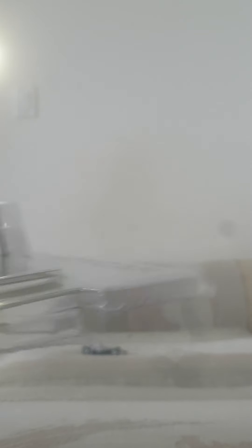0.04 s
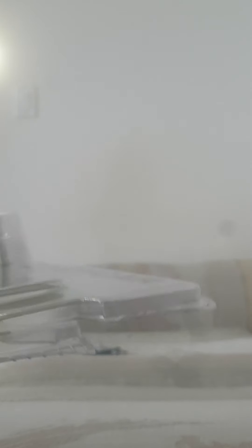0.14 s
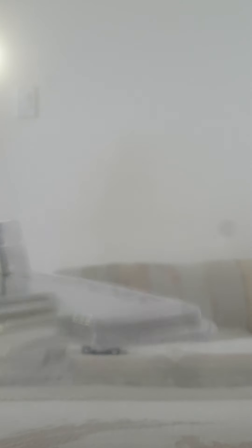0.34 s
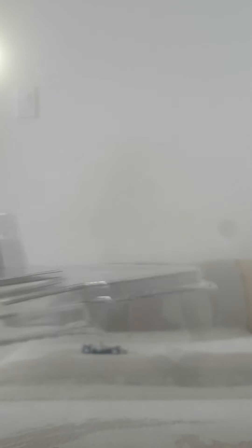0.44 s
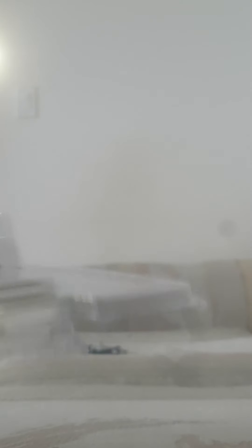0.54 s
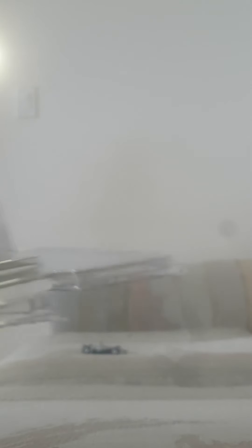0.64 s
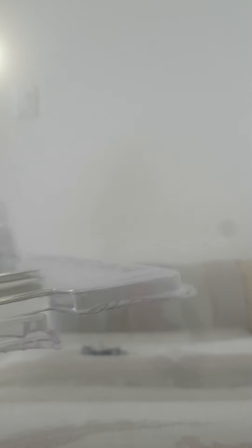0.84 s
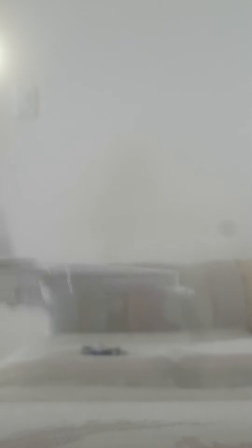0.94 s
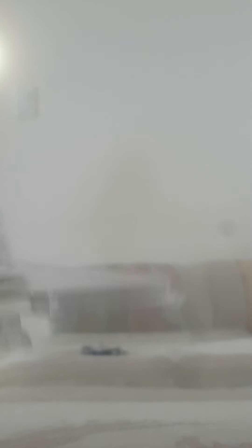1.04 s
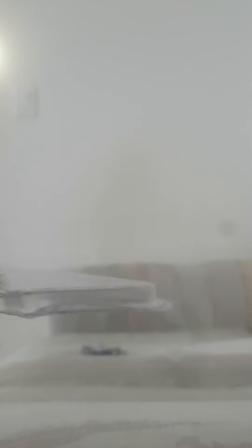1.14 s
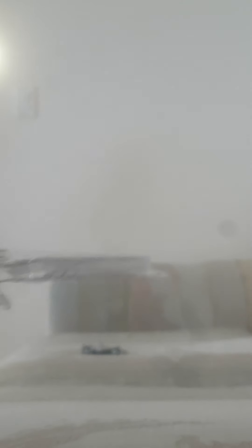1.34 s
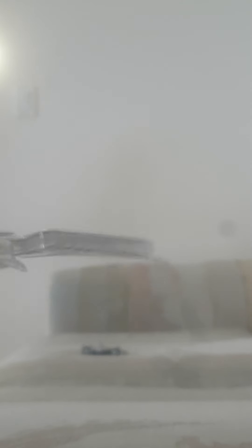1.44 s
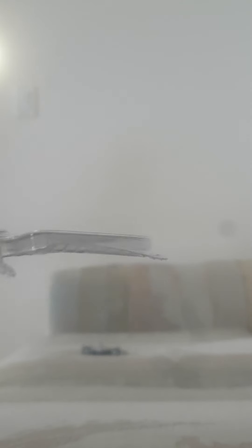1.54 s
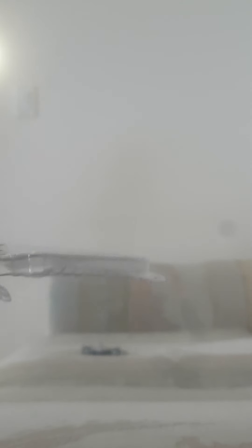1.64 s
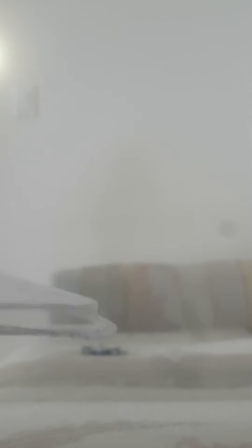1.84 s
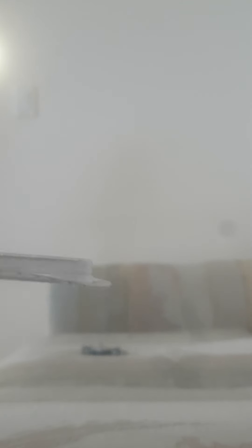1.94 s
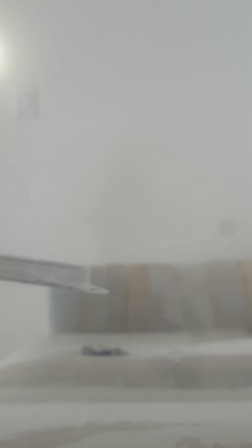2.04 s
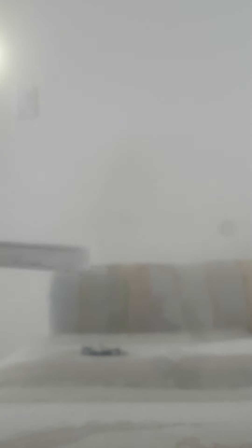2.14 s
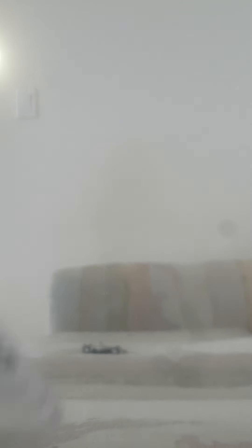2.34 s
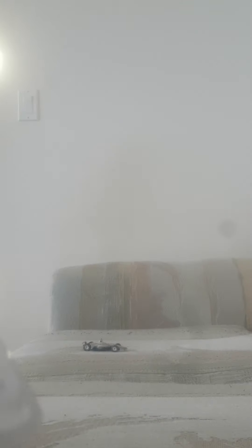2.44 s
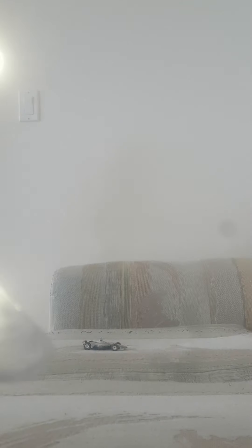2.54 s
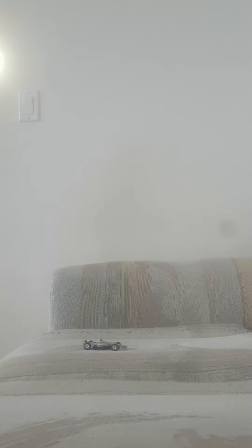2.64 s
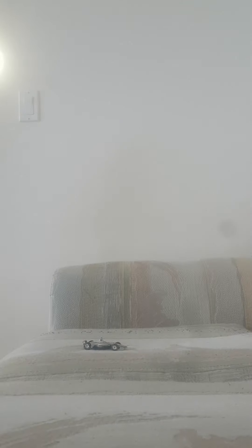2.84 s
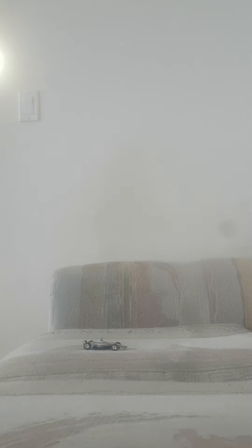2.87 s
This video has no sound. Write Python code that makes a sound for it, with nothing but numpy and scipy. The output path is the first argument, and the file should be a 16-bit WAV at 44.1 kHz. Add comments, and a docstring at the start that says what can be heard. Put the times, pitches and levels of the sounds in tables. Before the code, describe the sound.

Stiff thin plastic packaging crackles, pops and snaps in irregular bursts, close and left of a stereo pair in a quiet small room.

```python
"""Stiff clear plastic packaging snaps as hands bend and pull it apart, close to the left of a stereo recorder.
Each snap is a buckling instability: a jolt excites a damped panel and a spray of tiny slips makes the treble.
Stick-slip friction, as random grains through resonances, makes the rubbing; fainter random ticks fill the gaps.
A small room answers with wall echoes and a short tail over quiet rumble and hiss.
Two hard snaps also puff air at the near microphone."""
import sys
import numpy as np
from scipy import signal
from scipy.fft import rfft, irfft
from scipy.io import wavfile
from scipy.ndimage import uniform_filter1d, map_coordinates

SR = 44100
rng = np.random.default_rng(int(sys.argv[2]) if len(sys.argv) > 2 else 0)


def to_wav(sig):
    """Store sig (one row per channel, or 1-D mono) as 16-bit WAV at the path in sys.argv[1].

    Samples outside -1..1 are clipped; the rate is SR.
    """
    pcm = np.clip(np.atleast_2d(sig), -1, 1) * 32767
    pcm = np.round(pcm).astype(np.int16)
    wavfile.write(sys.argv[1], SR, pcm.T)  # frames by channels


N = 264159  # length [samples]
HZ = np.fft.rfftfreq(2048, 1 / SR)  # frequency grid of the filters [Hz]


def amp(db):
    """Decibel law: a level becomes an amplitude ratio."""
    return 10 ** (np.asarray(db) / 20)


def evened(x):
    """Root-mean-square normalisation: the mean power becomes one."""
    return x / np.sqrt(np.mean(x ** 2) + 1e-20)


def unit(x):
    """Energy normalisation: the sum of squares becomes one."""
    return x / np.linalg.norm(x)


def read(points, hz):
    """Logarithmic pitch scale: a curve is interpolated between its points along log frequency."""
    f, value = np.transpose(points)
    return np.interp(np.log(hz + 1), np.log(f + 1), value)


def causal(db):
    """Minimum phase: the Hilbert transform of log gain gives the response of least delay."""
    log_gain = np.log(amp(np.maximum(db, -100)))
    circle = np.concatenate([log_gain, log_gain[-2:0:-1]])
    return np.fft.ifft(np.exp(np.conj(signal.hilbert(circle)))).real


def spray(chance, fade):
    """Spectral whitening: a burst of slips under the envelope fade, with no band left out."""
    for _ in range(3):
        spectrum = rfft(chance * fade)
        flat = irfft(spectrum / (abs(spectrum) + 1e-12), len(fade))
        chance = flat / (fade + .05)
    return unit(chance * fade)


# Resonances of the plastic shell: (frequency [Hz], width [Hz], height [dB])
SHELL_MODES = [(124.1, 13, 6.5), (381.7, 22, 5), (603, 310, 5), (1052, 400, 5), (1990, 940, 5),
               (3880, 650, 3), (9050, 3100, 3), (13400, 8400, 4)]


def shell_db():
    """Modal resonance: the shell's modes stand as bumps on a flat response."""
    return sum(db / (1 + (2 * (HZ - hz) / width) ** 2) for hz, width, db in SHELL_MODES)


# Restless fingers on the plastic: (time [s], body level [dB], fizz level [dB])
RUBBING = [(0.0, -66.5, -71.5), (0.83, -72, -76.5), (1.07, -59, -71), (1.27, -68.5, -72.5),
           (3.85, -66.5, -74.5), (4.1, -52, -75), (4.42, -62.5, -65), (4.85, -48.5, -57.5),
           (5.37, -57, -72), (5.99, -83.5, -90.5)]
# Single strokes: (start [s], end [s], body level [dB], fizz level [dB])
STROKES = [(0.401, 0.466, -59.5, -64), (0.514, 0.595, -64.5, -50.5), (1.175, 1.257, -43, -42.5),
           (1.827, 1.935, -48.5, -46.5), (2.059, 2.168, -59, -57.5), (2.528, 2.603, -55, -58.5),
           (2.693, 2.773, -36, -41), (2.831, 2.912, -60, -62.5), (2.88, 2.96, -38.5, -60),
           (4.247, 4.317, -48.5, -44), (4.385, 4.457, -42.5, -55), (5.024, 5.033, -52, -43),
           (5.137, 5.256, -63, -62.5), (5.247, 5.283, -58, -52.5), (5.442, 5.469, -51.5, -69)]
# Spectrum of the rubbing body: (frequency [Hz], gain [dB])
BODY_COLOUR = [(40, -33.5), (110, -5.5), (300, 1), (800, -3), (2300, -7), (3500, -22.5), (8000, -33.5)]


def rub():
    """Stick-slip friction: dense uneven slips ring the shell below and give dry fizz above."""
    s, body_db, fizz_db = np.transpose(RUBBING)
    t = np.arange(N) / SR
    body_gain = amp(np.interp(t, s, body_db))
    fizz_gain = amp(np.interp(t, s, fizz_db))
    for start, end, low_db, high_db in STROKES:
        progress = np.clip((t - start) / (end - start), 0, 1)
        stroke = np.sin(np.pi * progress ** 0.8) ** 1.56
        body_gain = body_gain + amp(low_db) * stroke
        fizz_gain = fizz_gain + amp(high_db) * stroke
    sizes = amp(4.14 * np.minimum(rng.exponential(1, N), 5))
    signs = rng.choice([-1., 1.], N)
    happens = rng.random(N) < 5000 / SR  # on average 5000 slips per second
    grains = evened(sizes * signs * happens) + 0.5 * rng.standard_normal(N)
    body_filter = causal(read(BODY_COLOUR, HZ) + shell_db())[:1200]
    fizz_colour = [(1200, -38.0), (3500, 7.0), (8000, -3.0), (15500, -3.5), (16200, -23)]
    fizz_filter = causal(read(fizz_colour, HZ) + shell_db())[:1200]
    body = signal.oaconvolve(grains, body_filter)[:N]
    fizz = signal.oaconvolve(grains, fizz_filter)[:N]
    # the grip catches and slackens
    smooth = uniform_filter1d(rng.standard_normal(N), 500)
    lumps = evened(uniform_filter1d(smooth, 500))
    return amp(3.0 * lumps) * body_gain * evened(body) + fizz_gain * evened(fizz)


# Relative spectrum of the room noise: (frequency [Hz], density [dB per Hz])
AIR_COLOUR = [(12, -13), (20, -2.5), (79, -13), (124, -20), (195, -11.5), (237, -19), (1210, -32),
              (2510, -29), (3330, -38), (5830, -37.5), (6910, -40.5), (15200, -49.5), (16500, -59.5)]
# Likeness of the noise on the two sides: (frequency [Hz], correlation [0 to 1])
AIR_LIKENESS = [(60, 0.3), (200, 0.32), (800, 0.78), (4000, 0.39)]
AIR_DB = -67  # mean level of both sides, before the left-right balance [dB]


def air():
    """Partially coherent noise: the quiet room's low rumble and hiss, alike on both sides by band."""
    frames, hz = N // 256 + 5, np.fft.rfftfreq(1024, 1 / SR)
    a, b, c, d = rng.standard_normal((frames, 513, 4)).T
    same = np.clip(read(AIR_LIKENESS, hz), -1, 1)[:, None]
    left = a + 1j * b
    right = same * left + np.sqrt(1 - same ** 2) * (c + 1j * d)
    spectra = np.array([left, right]) * amp(read(AIR_COLOUR, hz))[:, None]
    noise = signal.istft(spectra, nperseg=1024, noverlap=768)[1][:, :N]
    return amp(AIR_DB) * evened(noise)


# Decay of the tail: (frequency [Hz], time to fall 60 dB [s])
DECAY = [(100, 0.37), (400, 0.17), (1000, 0.2), (3000, 0.26), (8000, 0.24), (16000, 0.2)]
# Strength of the tail: (frequency [Hz], gain [dB])
TAIL_COLOUR = [(50, -6), (130, 4.5), (250, -17.5), (380, 6), (600, -5), (1500, -3.5), (5000, -5),
               (16000, -1.5)]
# Early echoes before colouring: (delay [ms], left level [dB], right level [dB])
ECHOES = [(2.114, -4, 3.5), (10.22, -11.5, -4.5), (11.724, -11.5, -11), (13.346, -14, -19),
          (14.43, -14, -17.5), (19.76, -16, -13), (35.5, -23, -30.5)]
# Spectrum of the early echoes: (frequency [Hz], gain [dB])
ECHO_COLOUR = [(100, -19), (500, -8.5), (2000, -5.5), (8000, -6)]


def room(x):
    """Reverberation: rough wall echoes, and sparse taps of random sign whose bands decay exponentially."""
    taps = np.zeros((2, SR // 2))
    grid = np.arange(100, SR // 2 - 20, 20)
    at = grid + rng.integers(0, 20, (2, (SR // 2 - 101) // 20))
    np.put_along_axis(taps, at, rng.choice([-1., 1.], at.shape), 1)
    taps /= np.linalg.norm(taps[0, :SR // 20])
    # only near things answer before the walls
    taps *= np.interp(np.arange(SR // 2) / SR, [.009, .011, .025], [.3, .6, .95])
    hz, t, spectra = signal.stft(taps, SR, nperseg=256)
    tail_db = -60 * t / read(DECAY, hz)[:, None] + read(TAIL_COLOUR, hz)[:, None]
    response = signal.istft(spectra * amp(tail_db), SR, nperseg=256)[1]
    echoes = np.zeros((2, 2048))
    for ms, left_db, right_db in ECHOES:
        at = round(ms * SR / 1000)
        smear = [spray(c, np.hanning(32)) for c in rng.standard_normal((2, 32))]
        echoes[:, at:at + 32] += amp([[left_db], [right_db]]) * smear
    echo_filter = causal(read(ECHO_COLOUR, HZ))[None]
    response[:, :2048] += signal.fftconvolve(echoes, echo_filter, axes=1)[:, :2048]
    return signal.oaconvolve(x, response, axes=1)[:, :N]


def snap(hz, thump_db, panel_db, crack_db, sizzle_db, pan_db, slip_ms, chance):
    """Buckling instability: one jolt rings the panel that buckled; a dying spray of slips makes the treble."""
    t = np.arange(len(chance)) / SR
    thump_colour = [(15, -25.5), (60, 1), (150, 11), (400, -7.0), (2000, -76.5)]
    thump = unit(causal(read(thump_colour, HZ) + shell_db()))

    slope_db = read([(100, -36.5), (300, 0), (2500, -1), (4500, -15.5), (16000, -36.5)], HZ)
    # each bend leaves the lesser modes elsewhere
    slope_db += 3.25 * np.interp(HZ, np.geomspace(200, 5000, 30), chance[-30:])
    width = 38.0 + hz ** 2 / 8100.0  # small panels are damped harder [Hz]
    ring_db = 7.4 / (1 + ((HZ - hz) / width) ** 2)
    # a large panel radiates little above its own pitch, and a small one little below it
    ring_db -= 3.87 * np.log2(1 + (HZ / (1.35 * hz)) ** 2) / 2
    ring_db -= 1.3 * np.log2(1 + (0.51 * hz / (HZ + 1)) ** 2) / 2
    panel = unit(causal(slope_db + ring_db + shell_db()))

    fade = np.exp(-1000 * t / np.clip(slip_ms, .1, 8)) * np.minimum(t / .0003, 1)
    slips = spray(chance, fade)
    # each crease has its own bands
    uneven_db = 3.17 * np.interp(HZ, np.geomspace(1500, 16000, 24), chance[-60:-36])
    crack_colour = [(1500, -14.5), (2800, 11), (6000, 12.5), (9000, -14.0)]
    sizzle_colour = [(4500, -27.5), (7500, 3.0), (16000, 3.5)]
    crack = unit(causal(read(crack_colour, HZ) + shell_db() + uneven_db))
    sizzle = unit(causal(read(sizzle_colour, HZ) + shell_db() + uneven_db))
    treble_filter = amp(crack_db) * crack + amp(sizzle_db) * sizzle
    treble = signal.fftconvolve(slips, treble_filter)[:len(panel)]

    # a flexing sheet may push one microphone and pull the other
    sides = np.array([[1], [np.sign(chance[0] + .4)]])
    return amp(thump_db) * sides * thump + amp([[0], [-pan_db]]) * (amp(panel_db) * panel + treble)


# Creases that let go, levels as they leave the plastic: (time [s], panel pitch [Hz], thump energy [dB],
# panel energy [dB], treble before its crack-sizzle tilt [dB], left over right in panel and treble [dB])
SNAPS = [(0.0335, 396, -25, -27.5, -34.5, -1.5), (0.082, 480.0, -17, -28.0, -38, 4),
         (0.102, 945, -15.5, 1, 0.6, 5.5), (0.1419, 765, -32.0, -9.5, -13.5, 5),
         (0.149, 2150, -25, -16.5, -29, 0.5), (0.3363, 705, -27, -9, -32, 1.5),
         (0.4046, 1940, -36, -38, -46, 1), (0.4207, 462, -27.5, -22.5, -29.5, 3),
         (0.6653, 362, -19.5, -15.5, -17, 3), (0.6995, 706, -36, -23, -48.0, 5),
         (0.8356, 2140, -29, -4.5, -19, 21), (0.8439, 2140, -20, -8.5, -17, -4.5),
         (0.864, 2230.0, -25, 4.5, -5.5, 5.5), (0.8867, 2310.0, -27, 0.5, -7, 2.5),
         (0.8914, 2050.0, -37, -2, -5, 7.5), (0.979, 2320, -35, -9, -19.0, 4.5),
         (0.996, 248, -18, -13, -24, 3), (1.0172, 353, -7, 2.5, -8.5, 2.5),
         (1.1703, 950.0, -26, -17.0, -20.5, 3), (1.2164, 1270.0, -17, -20, -11, 23),
         (1.316, 814, -42, -26.5, -32, 4.0), (1.5116, 530, -39, -19.5, -30, -3.0),
         (1.5273, 734, -4.5, -10.5, -16.5, -1.5), (1.56, 553.0, -26, -5.0, -17.5, -1),
         (1.5943, 617, -9.5, -6, -15.5, -1.5), (1.6357, 610.0, -17.5, -15.5, -20.5, 0),
         (1.8002, 1120, -35, -33.5, -33.5, -10.5), (1.8319, 616.0, -39, -21, -9.5, -2),
         (1.8451, 417.0, -35, -24.0, -13, 13.0), (1.8681, 424, -30.5, -30, -42, -11),
         (1.876, 613, -15, -24, -26, -8), (2.0973, 715, -55, -30, -36, -4),
         (2.1538, 620.0, -17.5, -8, -12.25, -4.5), (2.178, 600, -10.5, -4.5, -14.5, 4.5),
         (2.2194, 670, -15, -11.5, -19.5, -4.5), (2.2693, 550, -11.0, 0.5, -12.0, 4.5),
         (2.3354, 1000, -19, -7.5, -20.75, 0), (2.3777, 730, -40.0, -30, -18.25, 10),
         (2.5486, 445, -27.5, -33.5, -35, -14), (2.722, 324, -17, -1.5, -10, 14),
         (2.9163, 596, -30, -12, -42, -5.5), (2.9221, 460, -18.5, -9.5, -18, -1),
         (2.9278, 1900, -25.5, -5.5, -13, 8), (2.9814, 634, -35, -19.5, -33, 4),
         (3.0366, 1130, -51, -18.5, -33.5, 3), (3.1261, 840, -44, -24, -32.5, 11),
         (3.2388, 1300, -35, -3.5, -25.5, 6.5), (3.2545, 410.0, -39.0, -30, -26, 15.0),
         (3.2892, 480, -28.5, -10.5, -15.5, -5.5), (3.3192, 1430, -31, 1.5, -13, 8.5),
         (3.3778, 1200, -32, -12.5, -12.5, 1.5), (3.437, 840, -37, -20.5, -40, -0.5),
         (3.6212, 660.0, -44.0, -16.5, -54, 0.5), (3.643, 510.0, -30, -33, -24, -7),
         (3.7602, 1000.0, -28.5, -17.5, -27, -6), (3.8128, 790.0, -39.0, -27.0, -28.0, 3.0),
         (3.8448, 600.0, -57, -25.5, -34.5, 0.5), (3.91, 517, -25.5, 3, -11.5, 3.5),
         (3.9479, 1750, -25, -1.5, -7.5, 6), (3.9788, 620, -39.0, -17.5, -31, -3),
         (4.011, 2030.0, -7.0, 10, -0.25, 10), (4.0157, 990.0, -11.5, 4, -7.5, 10),
         (4.0336, 675, -23.5, 3.5, 0.5, 2.5), (4.1227, 1940, -20.0, 12.5, 5.5, 4.5),
         (4.1536, 1100.0, -36.5, -16.5, -17.5, -2), (4.189, 808, -45.0, -5.0, -15.5, 5),
         (4.22, 2040, -23, -10, -15.5, -7.5), (4.2404, 1670.0, -28, -8.5, -3.0, -6),
         (4.2871, 2100, -21, -6, -11.25, 6), (4.411, 960.0, -42, -15, -33, 31),
         (4.4186, 900.0, -22, -33, -30.5, -7), (4.4367, 369, -19.0, 7, 2, 12),
         (4.507, 320, -21.5, -12.5, -27, 1.0), (4.571, 520, -37, -19.5, -30, -9),
         (4.601, 674, -42, -11, -14, 0.5), (4.6243, 1200.0, -32, -13, -13.25, 5.5),
         (4.6491, 418, -9.5, 10.5, -5, 2.5), (4.6861, 540, -33, -11.0, -19.5, 2.0),
         (4.7613, 1140, -22, 8, -0.5, 4.5), (4.8352, 1460.0, -25, -18, -24, 6),
         (4.8498, 2200.0, -22, -6, -6.25, 13), (4.864, 583, -12.5, 3, 7.5, 7),
         (4.9505, 650, -21, -5, -3.5, 3.5), (5.0229, 900, -45, -15.0, -20.5, 20),
         (5.038, 1400, -28.0, -1, -18, 14), (5.0663, 1010, -34, -24, -17, -10),
         (5.0698, 1170, -27, -24, -19.5, -10), (5.1025, 1030, -47.0, -15.5, -55.0, -1.0),
         (5.2493, 1110, -33, -25, -29, -9.5), (5.2578, 1030, -18, -14.5, -31, 23),
         (5.2975, 380.0, -25.5, -21, -36.5, 0.5), (5.3714, 550, -30.5, -36, -45, -5),
         (5.4179, 1080, -35, -31, -42, -5), (5.4316, 1120, -40, -20.5, -46.5, -1.0),
         (5.4835, 1030, -40.5, -32.5, -44, -3), (5.6357, 2220.0, -5, 3.5, 11, 5.5),
         (5.7426, 1550.0, -45, -21, -27, -2.5), (5.8526, 2450.0, -47.5, -24, -28, 5.0),
         (5.9458, 713.0, -57, -31.5, -48.5, 0)]
SLIP_MS, SLIP_SPREAD = .8, .3  # median decay of a crease's slips [ms], and its deviation [log]
# sizzle over crack [dB]; it grows with the extra path, as the hands move towards the near microphone [dB per ms]
SIZZLE_DB, SIZZLE_DB_PER_MS = 0.5, 29.5
SIZZLE_SPREAD_DB = 3  # no two creases are equally bright [dB]


def snaps():
    """Superposition: every snap and tick adds up, as it leaves towards the left and right microphone."""
    out = np.zeros((2, N + 4000))
    chance = rng.standard_normal((len(SNAPS) + 60, 512))
    for (s, hz, thump_db, panel_db, treble_db, pan_db), c in zip(list(SNAPS) + ticks(), chance):
        path_ms = np.interp(s, *np.transpose(EXTRA_PATH))
        tilt_db = SIZZLE_DB + SIZZLE_DB_PER_MS * path_ms + SIZZLE_SPREAD_DB * c[2]
        crack_db, sizzle_db = treble_db - tilt_db / 2, treble_db + tilt_db / 2
        slip_ms = SLIP_MS * np.exp(SLIP_SPREAD * c[1])
        sound = snap(hz, thump_db, panel_db, crack_db, sizzle_db, pan_db, slip_ms, c)
        at = max(round(s * SR), 0)
        out[:, at:at + sound.shape[1]] += sound
    return out[:, :N]


TICKS_PER_S, TICK_LOW_HZ, TICK_HIGH_HZ = 5.2, 400, 1296  # mean rate and range of panel pitch
TICK_DB, TICK_SPREAD_DB = 28, 6  # panel above the rubbing body, and the most it strays either way [dB]
TICK_THUMP_DB, TICK_TREBLE_DB = -6.5, -12  # against the panel [dB]


def ticks():
    """Poisson process: faint snaps at random gaps, as strong as the fingers are restless."""
    s, body_db, _ = np.transpose(RUBBING)
    draw = rng.random((60, 4))
    when = np.cumsum(-np.log(1 - draw[:, 0]) / TICKS_PER_S)
    db = np.interp(when, s, body_db) + TICK_DB + 2 * TICK_SPREAD_DB * (draw[:, 1] - .5)
    hz = TICK_LOW_HZ * (TICK_HIGH_HZ / TICK_LOW_HZ) ** draw[:, 2]
    pan_db = 14 * (draw[:, 3] - .5)
    rows = np.transpose([when, hz, db + TICK_THUMP_DB, db, db + TICK_TREBLE_DB, pan_db])
    return list(rows[when < N / SR])


# Air from the hardest snaps: (time [s], direction [sign], time constant [ms], approximate peak [dB])
PUFFS = [(4.865, 1, 1.5, -12), (5.6355, -1, 1.16, -9.5)]


def puffs():
    """Damped displacement: each puff pushes the near membrane one way, and it swings slowly back."""
    t, out = np.arange(N) / SR, np.zeros(N)
    for s, direction, ms, db in PUFFS:
        u = np.maximum(t - s, 0) * 1000 / ms
        out += np.sign(direction) * amp(db) * 2 * u * (2 - u) * np.exp(-u)
    return out


# Extra path to the far microphone as the hands move left: (time [s], delay [ms])
EXTRA_PATH = [(0, 0.045), (2.3, 0.036), (2.8, 0.19), (5.99, 0.19)]
# How much weaker the far microphone hears: (frequency [Hz], loss [dB])
SHADOW = [(60, -3), (400, -1.5), (2400, 3), (4400, 4.5), (6500, 2.5), (8100, 12), (11000, 15.5),
          (15000, 25.5)]


def far_microphone(right):
    """Path difference and acoustic shadow: sound arrives later, shaded by the recorder's body."""
    lag = np.interp(np.arange(N) / SR, *np.transpose(EXTRA_PATH)) * SR / 1000
    late = map_coordinates(right, [np.arange(N) - lag], order=3)
    return signal.oaconvolve(late, causal(-read(SHADOW, HZ))[:1024])[:N]


def scene():
    """Superposition: plastic, room and air reach both microphones; puffs strike only the near left one."""
    plastic = snaps() + rub()
    left, right = plastic + room(plastic) + amp([[2.], [0.]]) * air()
    return np.array([left + puffs(), far_microphone(right)])


def record(dry):
    """Saturation, then band limiting: the hardest snaps squeeze against the ceiling of the input."""
    squeezed = .95 * np.tanh(dry / .95)
    low_pass = signal.firwin(255, 16400, window=("kaiser", 9), fs=SR)  # edge at 16400 Hz
    return signal.oaconvolve(squeezed, low_pass[None], "same")


dry = scene()
out = record(dry)
to_wav(out)
```